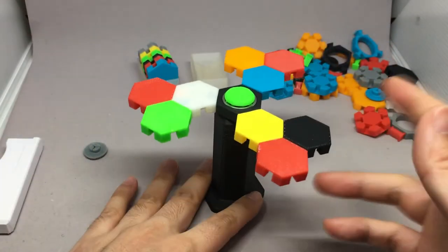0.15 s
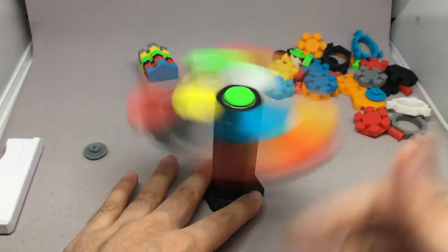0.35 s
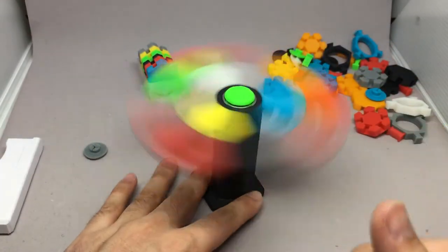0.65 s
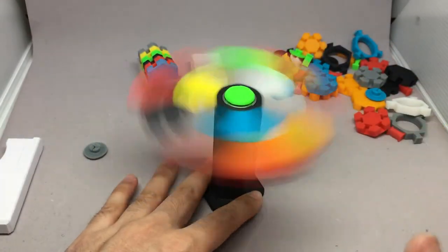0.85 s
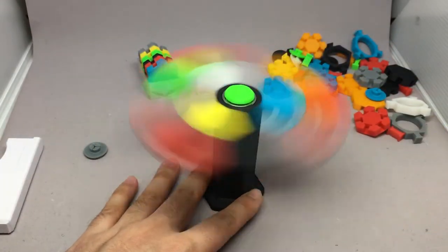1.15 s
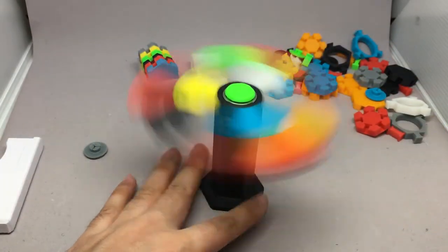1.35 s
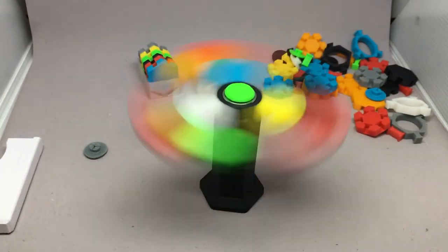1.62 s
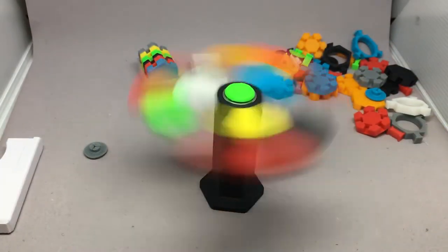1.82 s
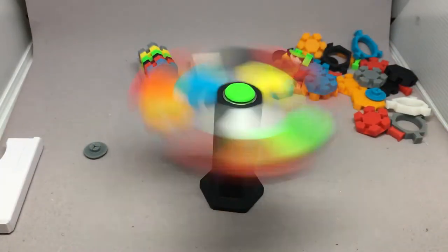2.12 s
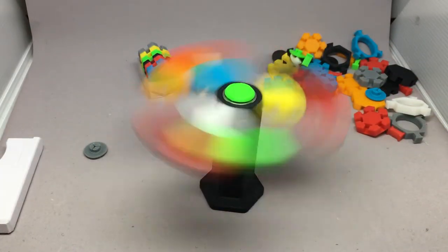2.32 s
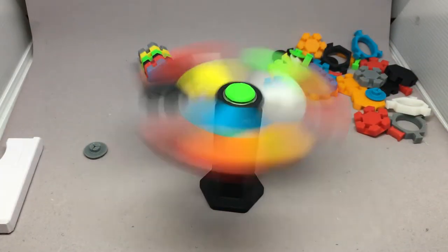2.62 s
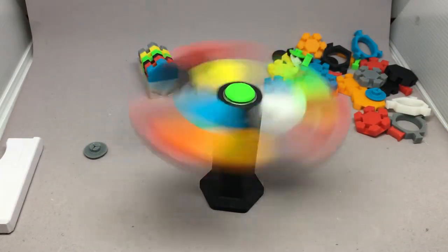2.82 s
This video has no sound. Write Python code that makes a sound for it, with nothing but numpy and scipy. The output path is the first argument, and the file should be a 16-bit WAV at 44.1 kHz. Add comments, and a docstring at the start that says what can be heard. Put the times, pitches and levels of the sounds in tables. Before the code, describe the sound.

A fidget spinner whirrs close by on a table in a quiet room. A finger clicks and scrapes it into motion, and the dense, steely bearing rattle turns from hollow to bright as a hand releases the stand.

```python
"""Fidget spinner on a stand

A plastic spinner on an upright stand is flicked on a table in a small room. A finger knocks and
scrapes an arm, the tabletop booms, then the balls of the bearing rattle densely through the stand
and the steel races. While a hand holds the stand down the whirr is low and hollow; once the hand
lifts it turns brighter."""
import sys
import numpy as np
from scipy import signal
from scipy.fft import rfft, irfft
from scipy.io import wavfile
from scipy.ndimage import uniform_filter1d

SR = 44100
rng = np.random.default_rng(int(sys.argv[2]) if len(sys.argv) > 2 else 0)


def inscribe(sig):
    """Save sig as 16-bit PCM at rate SR to the path in sys.argv[1].

    A 1-D sig is mono; a 2-D sig holds one channel per row.
    Samples are clipped to [-1, 1] before scaling.
    """
    pcm = np.round(np.clip(np.atleast_2d(sig).T, -1, 1) * 32767)
    wavfile.write(sys.argv[1], SR, pcm.astype(np.int16))


N = 130536
t = np.arange(N) / SR


def undb(db):
    """Decibels to gain."""
    return 10 ** (np.asarray(db) / 20)

def unit(x):
    """Scale to an rms of 1."""
    return x / np.sqrt(np.mean(x ** 2))

def fader(rows):
    """Gain along rows of t/s, level/dB; silent before the first."""
    when, db = np.array(rows).T
    return undb(np.interp(t, when, db)) * (t >= when[0])

def noise():
    """White noise."""
    return rng.standard_normal(N)

def flutter(rate_hz):
    """Smooth random wobble with a spread of 1 and no slow drift."""
    hold = int(SR / rate_hz)
    steps = uniform_filter1d(noise()[np.arange(N) // hold], hold)
    return unit(steps - uniform_filter1d(steps, 10 * hold))

def convolve(x, response):
    """Filter by an impulse response scaled to unit energy."""
    return signal.fftconvolve(x, response / np.linalg.norm(response))[:N]

def eq(x, points):
    """Minimum-phase EQ through points of f/Hz, level/dB."""
    hz, db = np.array(points).T
    bins_hz = np.fft.rfftfreq(4096, 1 / SR) + 1
    gain = undb(np.interp(np.log(bins_hz), np.log(hz), db))
    cepstrum = irfft(np.log(gain))
    cepstrum[1:2048] *= 2
    cepstrum[2049:] = 0
    return convolve(x, irfft(np.exp(rfft(cepstrum))))

def ring(x, modes):
    """Resonator bank: damped cosines of alternating polarity."""
    age = t[:SR // 2]
    response = 0
    for k, (hz, width, db) in enumerate(modes):
        envelope = undb(db) * width * np.exp(-np.pi * width * age)
        response += (-1) ** k * envelope * np.cos(2 * np.pi * hz * age)
    return convolve(x, response)

def band(x, hz, kind, order=4):
    """High-pass or low-pass."""
    return signal.sosfilt(signal.butter(order, hz, kind, fs=SR, output="sos"), x)

def ticks(per_s, scatter_db):
    """Dense tiny impacts of random size."""
    hits = (rng.random(N) < per_s / SR) * np.sign(noise())
    return unit(hits * undb(scatter_db * np.clip(noise(), -2, 2)))

def burst(start, decay):
    """Contact noise with an instant attack and an exponential tail."""
    return np.sign(noise()) * (t >= start) * np.exp(-np.abs(t - start) / decay)


# Room tone EQ: f/Hz, level/dB
AIR_EQ = [(20, -15.5), (40, 5.5), (60, -4.5), (120, -1), (210, -6.5), (270, -8.5), (340, -0.5),
          (430, -19.5), (800, -20.5), (2000, -21), (5000, -28), (15000, -35.5)]
# Fader ride on the hum: t/s, level/dB
HUM_FADER = [(0, -65.5), (.35, -72.5), (.5, -52), (.7, -71), (1.1, -91), (1.6, -86), (1.9, -69.5),
             (2.2, -65), (2.4, -98), (2.96, -86)]

def room_tone():
    """A bed of quiet air and a deep, wavering hum."""
    hum_hz = 37.9 * (1 + 0.06 * flutter(rate_hz=5.7))
    hum = unit(np.sin(2 * np.pi * np.cumsum(hum_hz) / SR))
    return undb(-70) * eq(noise(), AIR_EQ) + hum * fader(HUM_FADER)


# Soft hand hits: t/s, level/dB, decay/s, low-pass f/Hz
HAND_BUMPS = [(.005, -57, 0.027, 400), (0.08, -46.5, 0.026, 398), (1.34, -48.5, 0.036, 130)]

def hand_bumps():
    """Dull pushes as the hand presses on the table and leaves it."""
    return sum(undb(db) * band(burst(start, decay), hz, "low", order=1)
               for start, db, decay, hz in HAND_BUMPS)


# Boom of the tabletop: f/Hz, width/Hz, level/dB
TABLE_MODES = [(37, 4.7, -6.5), (79.3, 7.4, 5.5), (122, 57, -4), (152.6, 47, -1.5), (210.2, 26, 1.5),
               (315.5, 10, -11)]

def tabletop(push):
    """The table answers a push with its low modes."""
    return band(ring(push, TABLE_MODES), 415, "low")


# Dull knock EQ: f/Hz, level/dB
KNOCK_EQ = [(150, -4), (500, -0.5), (750, -4), (1150, 2), (1600, -14.5), (3000, -26), (10000, -45)]

def foot_knock():
    """The stand settles on its foot."""
    return eq(undb(-52.5) * burst(start=.0795, decay=0.0089), KNOCK_EQ)


# Stray ticks and grazes: t/s, level/dB, decay/s
STRAY_TICKS = [(0.15, -72, 0.0036), (1.364, -60, 0.11), (1.418, -51.5, 0.01), (2.004, -50.5, 0.0037),
               (2.25, -55, 0.024)]
# Steely hiss EQ: f/Hz, level/dB
STEEL_EQ = [(500, -17), (2000, -13.5), (3600, 10.5), (5000, 4), (7000, -7), (8000, -4), (10000, -5),
            (11800, -4.5), (13300, -9.5), (15000, -20)]

def ticks_and_grazes():
    """Light steely ticks, and a brief hiss as the hand slides off."""
    return eq(sum(undb(db) * burst(start, decay) for start, db, decay in STRAY_TICKS), STEEL_EQ)


# Finger hits on plastic: t/s, click level/dB, thump level/dB, click decay/s, low-pass f/Hz
FINGER_HITS = [(0.3237, -52, -54, 0.0052, 4940), (0.3865, -42.5, -45, 0.004, 14500)]
# Click EQ: f/Hz, level/dB
CLICK_EQ = [(150, 5), (500, -2.5), (1000, 2), (1400, -0.5), (2300, 0), (3100, -7), (3900, -1.5), (5000, -9),
            (6000, -11), (8000, -12), (11000, -7), (15000, -16)]
# Finger dragging along the arm: t/s, level/dB
DRAG_FADER = [(.38, -76), (.392, -39.5), (.41, -52), (.425, -42.5), (.458, -42.5), (.47, -52), (.5, -54.5),
              (.56, -57.5), (.6, -100)]
# Scrape EQ: f/Hz, level/dB
SCRAPE_EQ = [(150, 13.5), (500, -2.5), (1000, 4), (2000, -11), (4000, -7.5), (6300, -7), (8000, -17),
             (11000, -10), (15000, -19)]

def flick():
    """The finger clicks and scrapes on an arm, which also rings the steel races."""
    clicks = sum(undb(db) * band(burst(start, decay), hz, "low", order=1)
                 for start, db, _, decay, hz in FINGER_HITS)
    drag = ticks(per_s=1500, scatter_db=1) * fader(DRAG_FADER)
    steel = undb(-13) * ring(clicks + drag, RACE_MODES)
    return eq(clicks, CLICK_EQ) + eq(drag, SCRAPE_EQ) + steel


# Table shudder under the flick: t/s, level/dB
SHUDDER_FADER = [(.38, -82), (.392, -45), (.45, -38.5), (.48, -47), (.53, -58), (.6, -70), (.7, -83),
                 (.9, -110)]

def flick_weight():
    """The flick passes down the stand into the table: thumps, one sharp shove and a shudder."""
    thumps = sum(undb(db) * burst(start, decay=0.025) for start, _, db, _, _ in FINGER_HITS)
    shove_s, half_width_s = FINGER_HITS[-1][0] + 0.0029, 0.00059
    shove = undb(-37) * np.exp(-((t - shove_s) / half_width_s) ** 2)
    return thumps + shove + noise() * fader(SHUDDER_FADER)


def bearing(spin, swell):
    """Balls roll unevenly: two streams of ticks, to drive resonances and broadband body."""
    load = spin * undb(0.06 * swell + 0.78 * flutter(rate_hz=139.1))
    return [load * ticks(per_s=3500, scatter_db=4) for _ in range(2)]


# Steel ring of the races: f/Hz, width/Hz, level/dB
RACE_MODES = [(5754, 58, 1), (6630, 55, 3.5), (7010, 43, -2.5), (7860, 70, -13), (8210, 120, -12.5),
              (10600, 93, -6), (11140, 155, -5.5)]

def races(balls, rolling, swell):
    """The steel hisses under the balls and sings louder once each round."""
    return undb(-70.5 + 2 * swell) * ring(balls, RACE_MODES) + undb(-65.5) * eq(rolling, STEEL_EQ)


# Hollow resonances of the held stand: f/Hz, width/Hz, level/dB
HELD_MODES = [(614, 63, -2), (708, 68, -1), (803, 31, -1.5), (903.6, 15, -2), (1123, 54, -8),
              (1303, 54, -5.5), (1547, 98, -6.5), (1924, 97, -7.5), (2434, 140, -12.5), (3066, 73, -15),
              (5690, 71, -22)]
# Body between them: f/Hz, level/dB
HELD_EQ = [(200, -19), (480, -12.5), (620, 3), (1500, -3.5), (2200, -19), (3600, -4), (5000, -15.5),
           (8000, -42), (15000, -30.5)]
# Hollow whirr, out as the hand lifts: t/s, level/dB
HELD_FADER = [(.44, -51), (.56, -51.5), (.76, -50), (.92, -52), (1.05, -51.5), (1.15, -54), (1.24, -52),
              (1.29, -58), (1.34, -63), (1.39, -82), (1.6, -110)]
STAND_LOW_CUT_HZ = 544

def held_stand(balls, rolling):
    """The bearing rattles through the stand, low and hollow while the hand bears on it."""
    tone = band(ring(balls, HELD_MODES), STAND_LOW_CUT_HZ, "high", order=8)
    return (tone + undb(-6.5) * eq(rolling, HELD_EQ)) * fader(HELD_FADER)

def rolling_rumble(spin):
    """The stand passes the rolling on to the table, more so while held."""
    return noise() * spin * (undb(-77) + undb(-22) * fader(HELD_FADER))


# Bright resonances of the free stand: f/Hz, width/Hz, level/dB
FREE_MODES = [(683, 44, -12.5), (883, 95, -3.5), (953.5, 52, -0.5), (1305, 35, -5), (1468, 31.5, 1.5),
              (1742, 86, 2.5), (1985, 123, 2), (2713, 55, -2), (3033, 154, 1.5), (3157, 117, 1.5),
              (3310, 65, -3.5), (4037, 104, -4), (4475, 105, -3), (4753, 56, -9.5)]
# Body between them: f/Hz, level/dB
FREE_EQ = [(200, -30), (490, -21), (570, -5.5), (660, -6.5), (850, -3), (1600, -4), (2300, -3.5), (3400, 3),
           (5200, -19.5), (8000, -20.5), (15000, -47.5)]
# Bright whirr, in as the hand lifts: t/s, level/dB
FREE_FADER = [(1.15, -73), (1.29, -64), (1.39, -60.5), (1.5, -55), (1.7, -54.5), (2.96, -55)]

def free_stand(balls, rolling):
    """Left free, the stand rings higher under the same rattle."""
    tone = band(ring(balls, FREE_MODES), STAND_LOW_CUT_HZ, "high", order=8)
    return (tone + eq(rolling, FREE_EQ)) * fader(FREE_FADER)


# Ring of the loose foot: f/Hz, width/Hz, level/dB
FOOT_MODES = [(886, 35, -2), (952, 23, 1.5), (3360, 270, -10.5), (4370, 230, -12.5), (5810, 120, -11)]
# Its brief swell: t/s, level/dB
FOOT_FADER = [(1.3, -88), (1.36, -58.5), (1.4, -55), (1.46, -65), (1.55, -70), (1.7, -85)]

def loose_foot(balls):
    """The loosened foot rings while the last fingers slide off."""
    return ring(balls, FOOT_MODES) * fader(FOOT_FADER)


def room(x, t60_s=0.13, wet_db=-14):
    """Short scattered echoes off table and walls."""
    tail = band(noise(), 10500, "low", order=1) * undb(-60 * t / t60_s) * (t > .003)
    return x + undb(wet_db) * convolve(x, tail)

def scene():
    """Mono mix of spinner, hand and table over the room tone."""
    rise_centre_s, rise_s = 0.404, 0.079  # the rattle fades in with the flick
    spin = .5 + .5 * np.sin(np.pi * np.clip((t - rise_centre_s) / rise_s, -.5, .5))
    cage_hz = 11.6 * np.exp(-0.064 * t)  # rounds of the balls, gently slowing
    swell = np.sin(2 * np.pi * np.cumsum(cage_hz) / SR)
    balls, rolling = bearing(spin, swell)
    contacts = foot_knock() + ticks_and_grazes() + flick()
    stand = held_stand(balls, rolling) + free_stand(balls, rolling) + loose_foot(balls)
    spinner = contacts + races(balls, rolling, swell) + stand
    low_end = tabletop(hand_bumps() + flick_weight() + rolling_rumble(spin))
    return (room_tone() + low_end + room(spinner))[None]

def record(dry):
    """The microphone cuts the top steeply above 15.3 kHz."""
    return signal.sosfilt(signal.ellip(10, .2, 70, 15300, fs=SR, output="sos"), dry)


dry = scene()
out = record(dry)
inscribe(out)
```